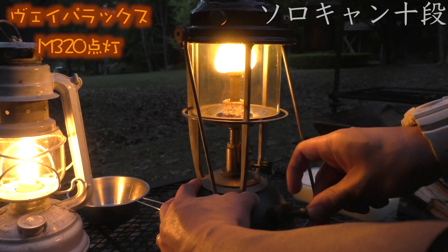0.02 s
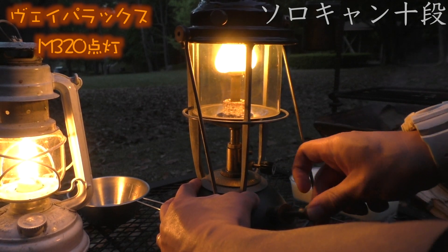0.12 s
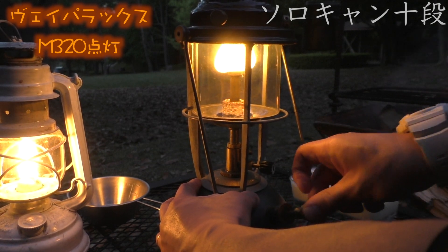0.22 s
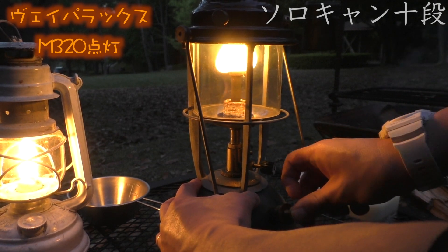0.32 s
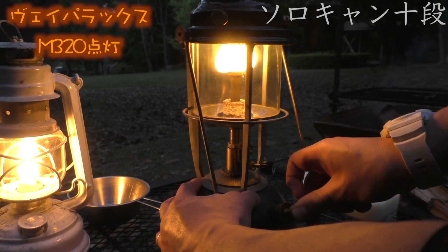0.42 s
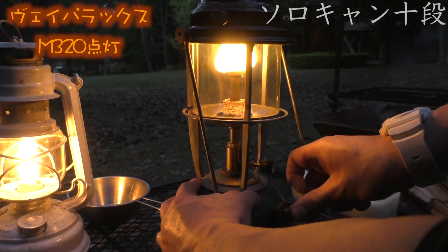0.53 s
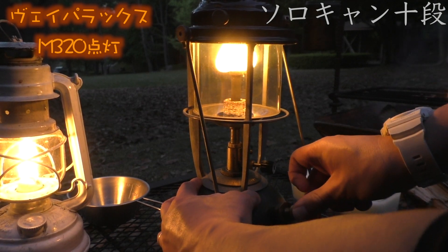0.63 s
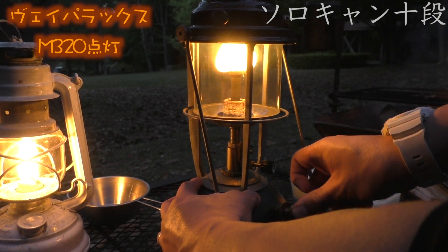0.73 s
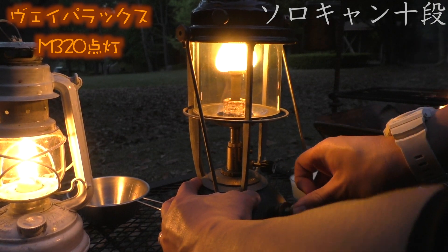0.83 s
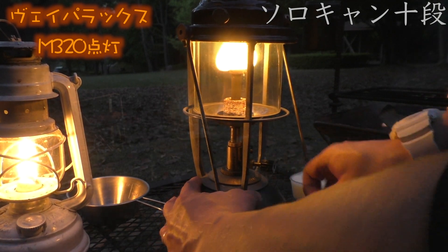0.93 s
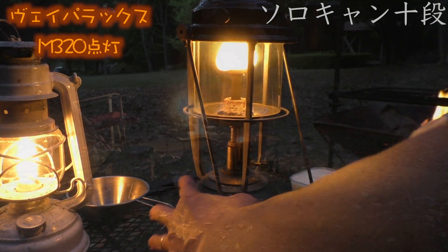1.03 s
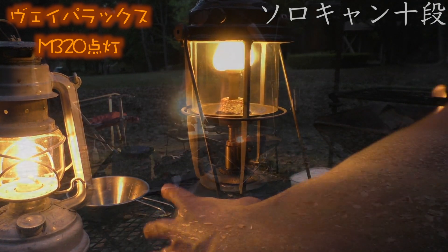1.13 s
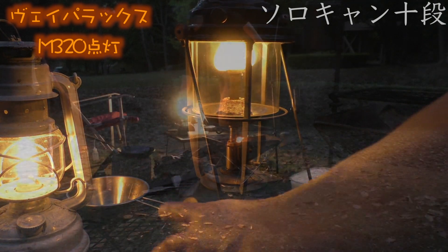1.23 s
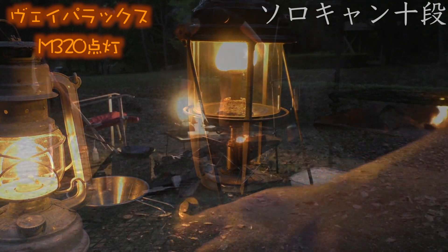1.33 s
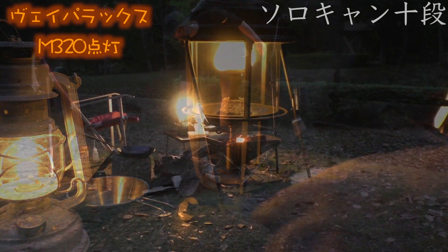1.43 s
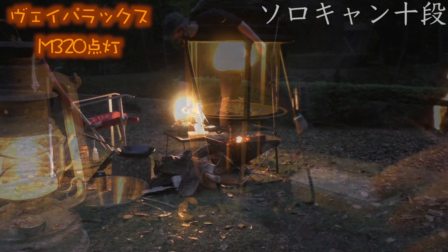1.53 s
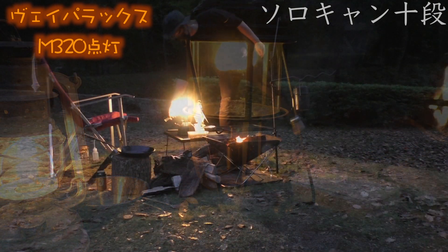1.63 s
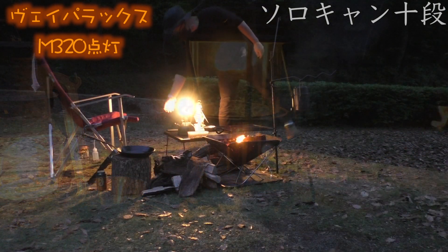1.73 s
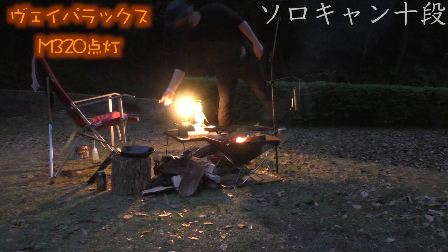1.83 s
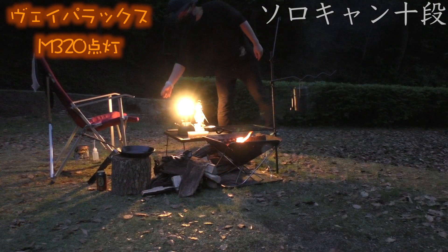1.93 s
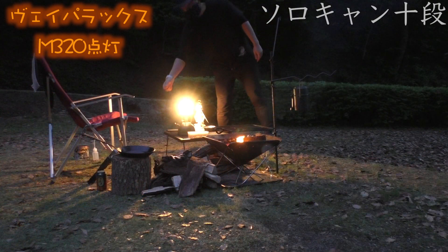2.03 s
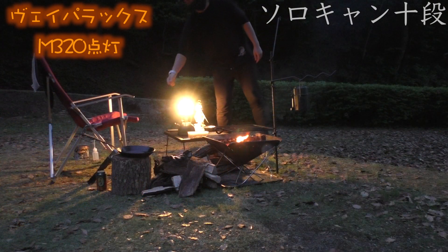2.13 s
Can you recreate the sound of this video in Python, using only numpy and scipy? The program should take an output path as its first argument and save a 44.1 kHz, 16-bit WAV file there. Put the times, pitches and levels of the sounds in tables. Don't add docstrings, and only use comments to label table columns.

```python
import sys
import numpy as np
from scipy import signal
from scipy.fft import rfft, irfft, next_fast_len
from scipy.io import wavfile
from scipy.ndimage import uniform_filter1d, map_coordinates

SR = 44100
rng = np.random.default_rng(int(sys.argv[2]) if len(sys.argv) > 2 else 0)


def output_pcm(signal):
    pcm = np.clip(np.atleast_2d(signal).T, -1, 1) * 32767
    wavfile.write(sys.argv[1], SR, np.round(pcm).astype(np.int16))


def gain_from_decibels(decibels):
    exponent = np.asarray(decibels, float) / 20
    return 10 ** exponent


N = 97020

# f/Hz, likeness (1 = the same)
LIKENESS = [(60, 0.43), (400, 0.77), (2500, 0.62), (5000, 0.86), (7200, 1), (9500, 0.9), (12500, 0.93),
            (16000, 0.63)]
# t/s, level/dB, brightness/dB, crack t60/s
STOP_HITS = [
    (.3363, -0.5, 3.5, 0.012),
    (.3402, -18.5, 10.5, 0.04),
]
# f/Hz, level/dB per Hz
THIN_CRACK = [(350, -54), (600, -11.5), (3830, -7.5), (5260, 3), (6460, -2), (9760, 5), (16000, -11)]
HEAVY_CRACK = [(350, -63), (600, -31), (1470, -1.5), (1800, -7), (2180, -9.5), (6460, -18.5), (8740, -15),
               (16000, -26.5)]


def unit(x):
    return x / np.sqrt(np.mean(x ** 2) + 1e-20)


def along(points, hz):
    f, v = np.transpose(points)
    return np.interp(np.log(hz + 1), np.log(f + 1), v)


def curve(rows):
    return np.interp(np.arange(N) / SR, *np.transpose(rows))


def wobble(rate):
    knots = rng.standard_normal(int(N * rate / SR) + 4)
    return map_coordinates(knots, [np.arange(N) * rate / SR])


def filtered(x, response):
    m = next_fast_len(N + SR // 2)
    return irfft(rfft(x, m) * response(np.fft.rfftfreq(m, 1 / SR)), m)[..., :N]


def piped(tone, pipes):
    def gain(f):
        humps = sum(gain_from_decibels(2 * db) * np.exp(-((f - c) / w * 2) ** 2) for c, w, db in pipes)
        return gain_from_decibels(along(tone, f)) * np.sqrt(1 + humps)
    return gain


def rush(gain, likeness):
    # f/Hz, level/dB
    left_over_right = [(60, 4), (950, -1), (15000, -0.5)]

    def spread(hz):
        turn = np.arccos(np.clip(along(likeness, hz), -1, 1)) / 2
        return gain(hz) * (hz < 15750) * [np.cos(turn), np.sin(turn)]

    def lean(hz):
        return gain_from_decibels(np.outer([.5, -.5], along(left_over_right, hz)))

    mid, side = filtered(rng.standard_normal((2, N)), spread)
    return unit(filtered(np.array([mid + side, mid - side]), lean))


def struck(rows, modes, colour, crack_db, rough, rise_s, air_hz=10500, scatter_db=0):
    out = np.zeros(N + SR)
    t = np.arange(SR // 5) / SR
    f = np.fft.rfftfreq(len(t), 1 / SR)
    air_dies = .5
    for s, db, bright_db, crack_t60 in rows:
        noise = rng.standard_normal((len(modes), len(t)))
        shiver = 1 + rough * uniform_filter1d(noise, size=40, axis=1) * np.sqrt(40)
        ring = 0
        for k, (hz, level, t60) in enumerate(modes):
            mode_db = level + scatter_db * rng.standard_normal() + bright_db * (hz > 2500)
            wave = np.sin(2 * np.pi * hz * t + rng.random() * rough)
            ring = ring + shiver[k] * gain_from_decibels(mode_db - 60 * t / t60) * wave
        grit = rfft(rng.standard_normal(len(t))) * gain_from_decibels(along(colour, f) + bright_db * (f > 2500))
        low, top = irfft(grit * [f < air_hz, f >= air_hz], len(t))
        quicker = gain_from_decibels(-60 * t / crack_t60 * (1 / air_dies - 1.5))
        crack = (low + top / np.sqrt(air_dies) * quicker) / np.std(low + top)
        hit = ring + gain_from_decibels(crack_db - 60 * t / crack_t60) * crack
        out[round(s * SR):][:len(t)] += gain_from_decibels(db) * (1 - np.exp(-t / rise_s)) * hit
    low_cut = signal.butter(2, 74, "high", fs=SR)
    return signal.lfilter(*low_cut, out[:N])


def tones(rows, edge_s, rate):
    t = np.arange(N) / SR
    out = 0
    waver_hz, flutter_db = 22, 2.2
    for s, length, first_hz, last_hz, db in rows:
        shape = np.sin(np.clip(np.minimum(t - s, s + length - t) / edge_s, 0, 1) * np.pi / 2) ** 2
        glide = np.interp(t, [s, s + length], [first_hz, last_hz])
        hz = glide + waver_hz * first_hz / 1000 * wobble(2 * rate)
        wave = np.sin(2 * np.pi * np.cumsum(hz) / SR)
        out = out + np.sqrt(2) * shape * gain_from_decibels(db + flutter_db * wobble(rate)) * wave
    return out


def burner_jet():
    # t/s, level/dB
    jet_level = [(0, -44.5), (.3, -40.5), (.335, -41.5), (.352, -45), (.4, -50), (.45, -43), (.6, -42),
                 (.85, -45), (.95, -42.5), (1.15, -43), (1.3, -48), (1.44, -52.5), (1.58, -53.5),
                 (1.7, -56.5), (2.2, -58)]
    # f/Hz, level/dB per Hz
    jet_tone = [(30, -18), (60, -8), (300, 1), (700, -15.5), (2200, -11), (3200, -30.5), (11000, -13),
                (16000, -28)]
    # f/Hz, width/Hz, level over hiss/dB
    shaded_pipes = [(4000, 830, 18.5), (4970, 470, 18.5), (6420, 370, 13.5), (8610, 880, 7.5),
                    (11160, 740, 5), (11930, 360, 13), (12700, 430, 11.5), (14900, 1200, 14)]
    open_pipes = [(4000, 940, 15.5), (4930, 660, 16.5), (6410, 340, 11), (8910, 700, 11.5), (11180, 680, 5),
                  (12080, 450, 14.5), (12900, 450, 9), (14800, 1200, 13.5)]
    # t/s, share of the open colour (0 to 1)
    unshade = [(.88, 0), (1.02, 1)]
    share = curve(unshade)
    shaded = rush(piped(jet_tone, shaded_pipes), LIKENESS)
    opened = rush(piped(jet_tone, open_pipes), LIKENESS)
    hiss = np.sqrt(1 - share) * shaded + np.sqrt(share) * opened
    return gain_from_decibels(curve(jet_level) + .7 * wobble(10.6)) * hiss


def camp_air():
    # f/Hz, level/dB per Hz
    air_tone = [(30, -17), (60, -8.5), (190, -3), (380, -10.5), (650, -26), (1100, -10.5), (2500, -13),
                (16000, -31.5)]
    # f/Hz, width/Hz, level over air/dB
    far_pipes = [(6620, 130, -2.5), (9900, 190, 6), (13100, 980, 10.5)]
    return gain_from_decibels(-50 + .7 * wobble(15)) * rush(piped(air_tone, far_pipes), LIKENESS)


def wire_ticks():
    # t/s, level/dB, brightness/dB, crack t60/s
    tick_hits = [
        (.0867, -40, -3, 0.017),
        (.124, -52, -5, .012),
        (.605, -37, -3, 0.023),
        (.784, -37, 0, .015),
        (.8655, -40, 2, .015),
        (.9375, -27, 3, .012),
        (.9392, -32, 5, .025),
    ]
    # f/Hz, level/dB, t60/s
    wire_modes = [(3140, -10, 0.012), (7510, -6, .012), (8400, -1, 0.016), (10400, -13, 0.011)]
    return struck(tick_hits, wire_modes, THIN_CRACK, crack_db=1.5, rough=.5, rise_s=.0004, air_hz=15000)


def plunger_judder():
    # t/s, level/dB, brightness/dB, rasp t60/s
    slip_hits = [(.2228, -22.5, -14, 0.026), (.2242, -19, -1, 0.044), (.2278, -24, -7.5, 0.12),
                 (.2445, -31, 0, 0.06), (.2478, -24.5, -5.5, 0.055), (.2512, -26.5, 10, 0.034),
                 (.2645, -21, -1, 0.066), (.2685, -25.5, -7, 0.054), (.2772, -26, 4, 0.046),
                 (.2805, -25.5, -1, 0.054), (.2855, -31, -5, 0.044), (.2915, -21.5, 1.5, 0.07),
                 (.3045, -20, 5, 0.028), (.3075, -35.5, 14, 0.021)]
    # f/Hz, level/dB, t60/s
    barrel_modes = [(499, -19, 0.051), (693, -3, 0.046), (875.7, -8.5, 0.1), (1860, -0.5, 0.015),
                    (4590, -3.5, 0.018), (6150, -10.5, 0.022), (8250, -10, 0.018)]
    # f/Hz, level/dB per Hz
    rasp_tone = [(180, -54), (300, -15.5), (614, -2.5), (749, -31), (885, -4.5), (3580, -16.5), (8360, -12),
                 (16000, -36)]
    return struck(slip_hits, barrel_modes, rasp_tone, crack_db=-1.5, rough=.5, rise_s=.001,
                  air_hz=3000, scatter_db=4)


def taps():
    # t/s, peak level/dB, f/Hz, t60/s
    tap_hits = [(0.404, -36, 1450, 0.068), (.419, -29, 2100, 0.021), (0.423, -32, 2840, 0.046),
                (0.457, -34, 523, 0.019), (.56, -37, 322, 0.052), (0.606, -30.5, 1407, 0.054),
                (.609, -33, 2720, 0.04), (.704, -36.5, 1140, 0.033), (0.784, -35.5, 6900, 0.016),
                (.865, -40.5, 925, 0.055), (1.115, -44, 2150, 0.098), (1.218, -40, 1640, 0.052),
                (1.218, -34, 247, 0.023), (1.22, -43, 814, 0.043), (1.244, -42.5, 850, .06),
                (1.266, -38, 313, 0.026), (1.268, -48, 1300, .04), (1.32, -39.5, 316, 0.032),
                (1.321, -47, 770, 0.056), (1.321, -46, 1290, .04), (1.321, -47, 1610, .04),
                (1.465, -43.5, 1450, 0.052), (1.5513, -29.5, 4540, 0.0081), (1.5508, -32, 5050, 0.0079),
                (0.272, -41, 88, 0.12), (1.76, -44, 1690, 0.024), (1.782, -51, 1420, 0.025),
                (1.8534, -41, 1310, .02), (1.8813, -40, 1480, 0.023), (1.8813, -41, 3020, .015),
                (1.9018, -40, 2360, .02), (1.938, -45, 1200, .015), (1.958, -48, 1110, .02),
                (1.964, -47, 1520, 0.045)]
    out = np.zeros(N + SR)
    t = np.arange(SR // 8) / SR
    thump = (STOP_HITS[0][0], -26, 115, .05)
    for s, db, hz, t60 in tap_hits + [thump]:
        band = signal.butter(2, [hz * 0.46, min(hz * 2.2, .45 * SR)], "band", fs=SR)
        puff = signal.lfilter(*band, rng.standard_normal(len(t)))
        body = np.sin(2 * np.pi * hz * t) + gain_from_decibels(-7) * unit(puff)
        out[round(s * SR):][:len(t)] += gain_from_decibels(db - 60 * t / t60) * (1 - np.exp(-t / 0.00053)) * body
    return out[:N]


def catch_snap():
    # t/s, level/dB, brightness/dB, crack t60/s
    catch_hits = [
        (.3122, -10, 0.5, 0.023),
        (.3133, -7, 1.5, 0.025),
        (.3176, -20, -2, 0.058),
    ]
    # f/Hz, level/dB, t60/s
    catch_modes = [(1760, -24, 0.17), (3036, -10.5, 0.026), (4900, -9, 0.017), (6030, -22, 0.024),
                   (7180, -3.5, 0.01), (8850, -26, 0.022), (9600, -9, 0.019), (10700, -22, .02),
                   (12050, 7.5, 0.0081)]
    return struck(catch_hits, catch_modes, THIN_CRACK, crack_db=2, rough=0.39, rise_s=0.00023)


def fingers():
    # t/s, level/dB
    rustle_level = [(.33, -50.5), (.36, -36), (.4, -44.5), (.43, -37), (.5, -38.5), (.55, -43.5),
                    (.62, -39.5), (.7, -49), (.85, -47.5), (.88, -44), (1, -42), (1.1, -54), (1.2, -56),
                    (1.32, -55), (1.4, -64), (2.2, -60.5)]
    # f/Hz, level/dB per Hz
    skin_tone = [(100, -27), (300, -1), (1400, -1.5), (2800, -6), (5000, -11.5), (9000, -13.5),
                 (16000, -48)]
    grains_per_s, spread_db, grain_t60 = 1500, 1.5, .02
    hits = (rng.random(N) < grains_per_s / SR) * gain_from_decibels(spread_db * rng.exponential(size=N))
    t = np.arange(SR // 20) / SR
    swell = signal.fftconvolve(hits ** 2, gain_from_decibels(-120 * t / grain_t60))[:N]
    grains = np.sqrt(abs(swell)) * gain_from_decibels(1.9 * wobble(41.4)) * rng.standard_normal(N)
    return gain_from_decibels(curve(rustle_level)) * unit(filtered(grains, lambda f: gain_from_decibels(along(skin_tone, f))))


def stop_snap():
    # f/Hz, level/dB, t60/s
    stop_modes = [(1135, -24.5, 0.12), (1450, 7, 0.013), (2150, 1.5, 0.024), (2740, -16.5, 0.04),
                  (3988, -15, 0.041), (5660, -15.5, 0.018), (8800, -19.5, 0.033), (10310, -34, 0.11),
                  (12700, -34, 0.088)]
    return struck(STOP_HITS, stop_modes, HEAVY_CRACK, crack_db=1.5, rough=0.11, rise_s=0.00074)


def knob_squeak():
    # start t/s, length/s, first f/Hz, last f/Hz, level/dB
    squeak_tones = [
        (.918, .07, 1770, 1735, -41),
        (.918, 0.05, 886, 866, -44),
        (.92, .035, 4430, 4350, -54),
        (.92, .03, 2660, 2620, -52),
    ]
    hum_tones = [
        (1.275, .1, 440, 430, -58),
        (1.295, .1, 820, 815, -62),
    ]
    return tones(squeak_tones, edge_s=0.0074, rate=100) + tones(hum_tones, edge_s=0.0051, rate=30)


def knob_lock():
    # t/s, level/dB, brightness/dB, crack t60/s
    lock_hits = [
        (.9888, -26.5, 5, 0.038),
    ]
    # f/Hz, level/dB, t60/s
    knob_modes = [(463, -10, 0.065), (908, 1, 0.039), (2340, -1.5, 0.043), (2840, -11.5, 0.049),
                  (3580, -7, 0.026)]
    return struck(lock_hits, knob_modes, HEAVY_CRACK, crack_db=-8.5, rough=0.39, rise_s=0.0008)


def cloth():
    # t/s, level/dB
    swish_level = [(1.44, -74), (1.48, -51), (1.55, -52), (1.6, -59)]
    swish = rush(lambda f: (f > 3000) * np.exp(-f / 16000), [(6000, 0.3), (9000, 0.57)])
    return gain_from_decibels(curve(swish_level)) * swish


def dove():
    # start t/s, length/s, first f/Hz, last f/Hz, level/dB
    coos = [
        (1.7, .08, 255, 215, -56),
        (1.86, .18, 350, 354, -55),
        (2.015, .065, 255, 270, -54),
    ]
    return tones(coos, edge_s=0.026, rate=25) * gain_from_decibels([[1.5], [-1.5]])


def nearby(x):
    t = np.arange(SR // 6) / SR
    dull = signal.butter(1, 3080, fs=SR)
    tail = signal.lfilter(*dull, rng.standard_normal((2, len(t)))) * gain_from_decibels(-60 * t / 0.066)
    return signal.fftconvolve(x[None], tail / np.linalg.norm(tail[0]), axes=1)[:, :N]


def scene():
    near = wire_ticks() + plunger_judder() + taps() + catch_snap() + fingers()
    near = near + stop_snap() + knob_squeak() + knob_lock()
    skew_s = 4e-6
    direct = filtered(near, lambda f: np.exp(1j * np.pi * skew_s * np.outer([1, -1], f)))
    return direct + gain_from_decibels(-16.5) * nearby(near) + burner_jet() + camp_air() + cloth() + dove()


def top_cut(x):
    return signal.sosfilt(signal.butter(12, 16440, fs=SR, output="sos"), x)


def record(dry):
    ceiling, hardness = 1.05, 12
    mix = dry / (1 + abs(dry / ceiling) ** hardness) ** (1 / hardness)
    return top_cut(mix)


dry = scene()
out = record(dry)
output_pcm(out)
```